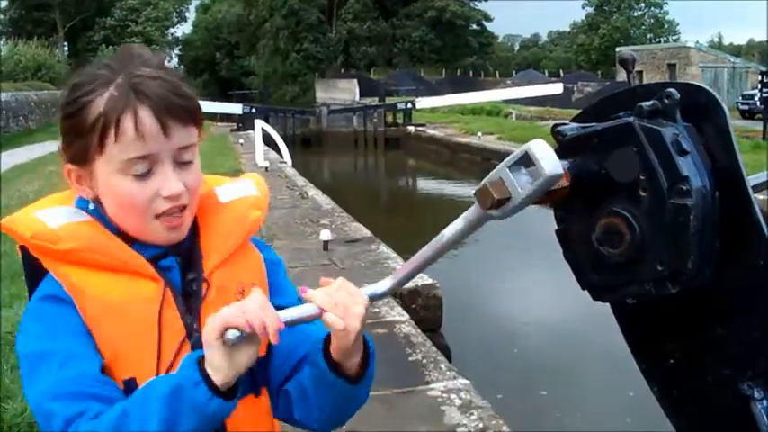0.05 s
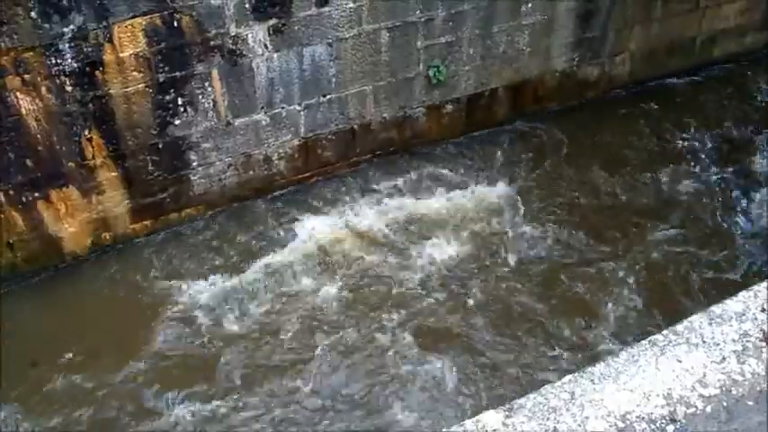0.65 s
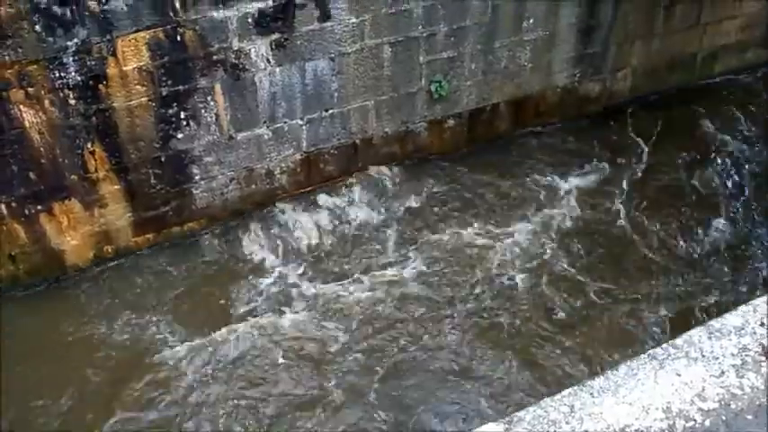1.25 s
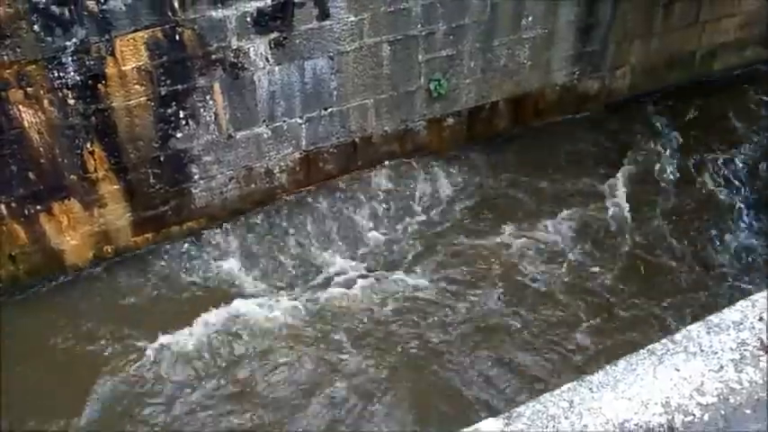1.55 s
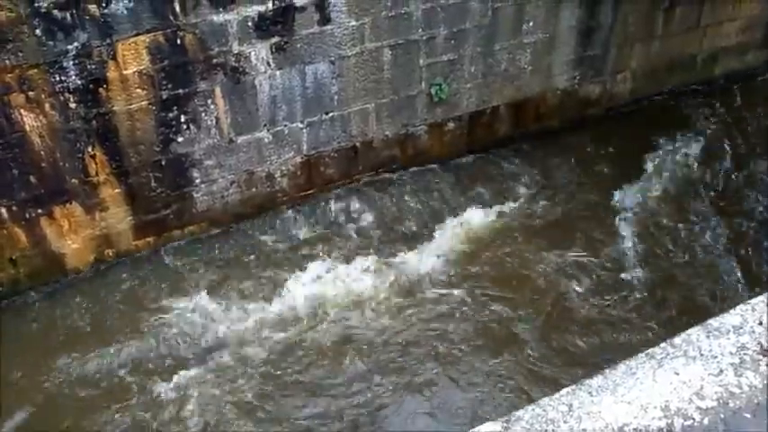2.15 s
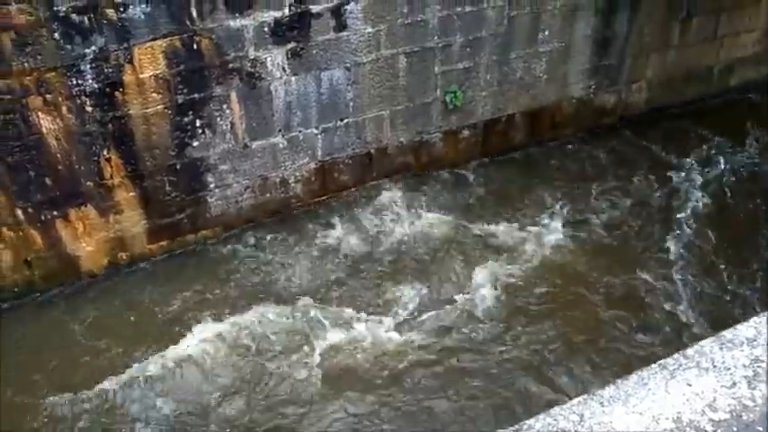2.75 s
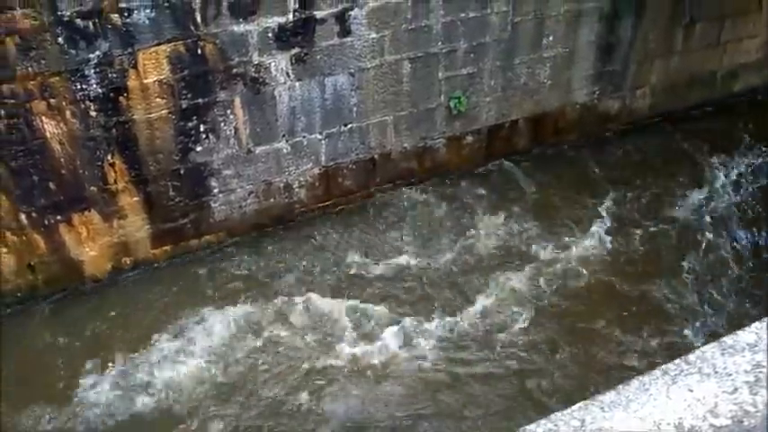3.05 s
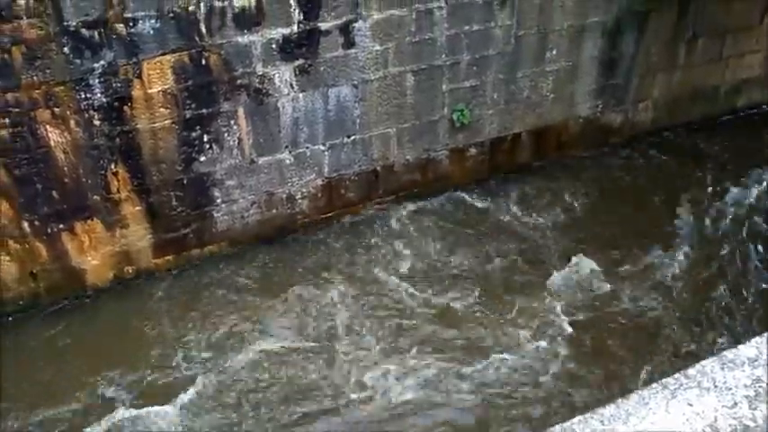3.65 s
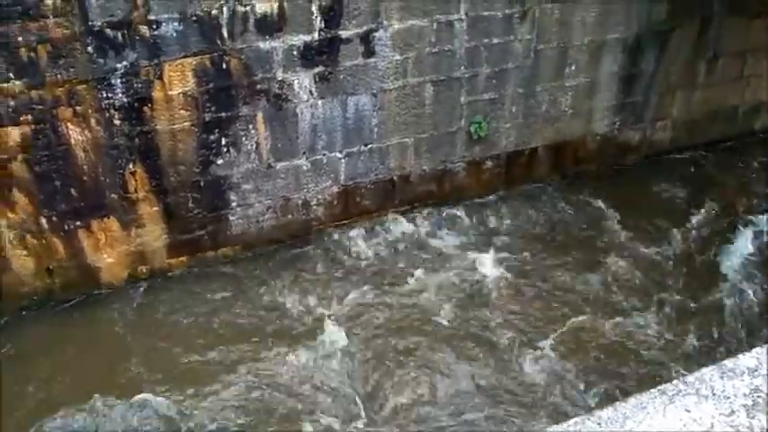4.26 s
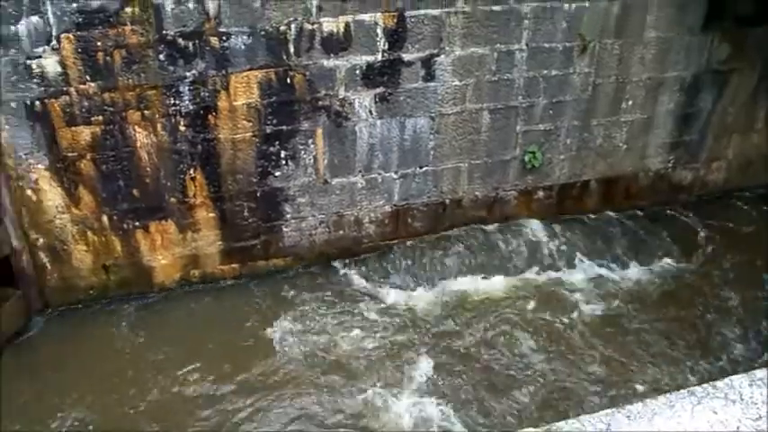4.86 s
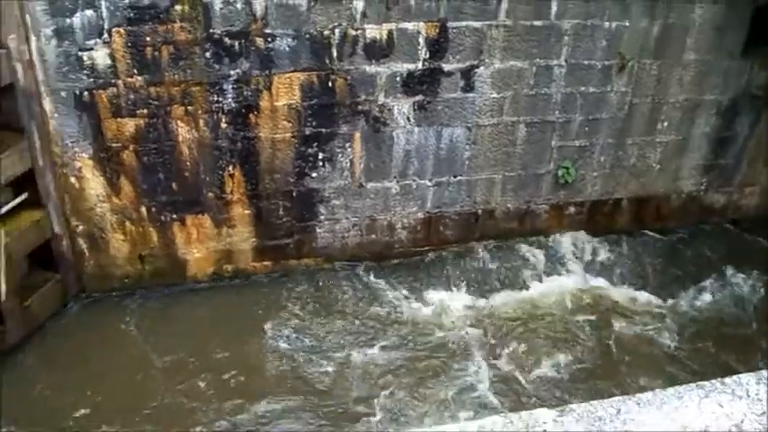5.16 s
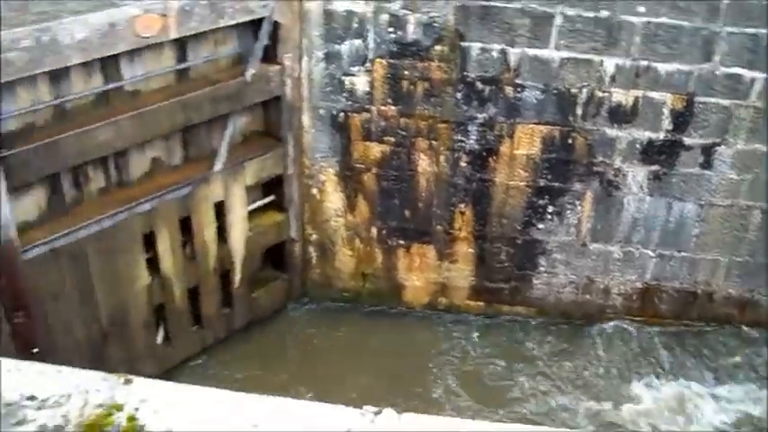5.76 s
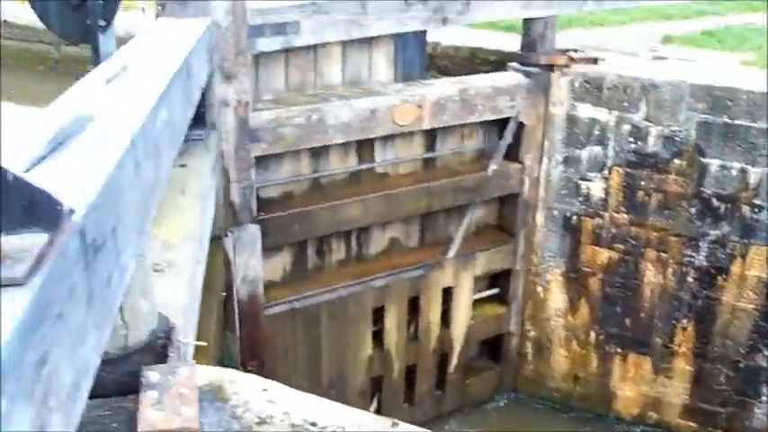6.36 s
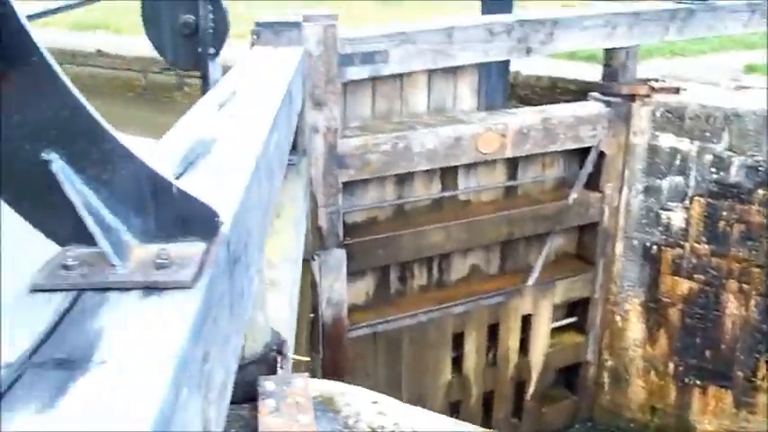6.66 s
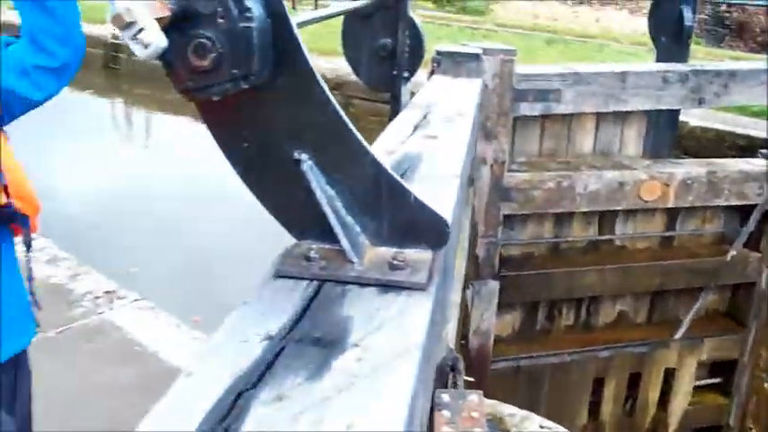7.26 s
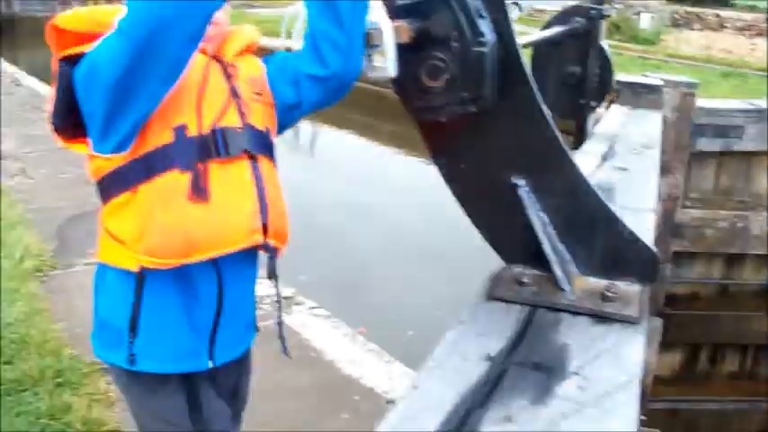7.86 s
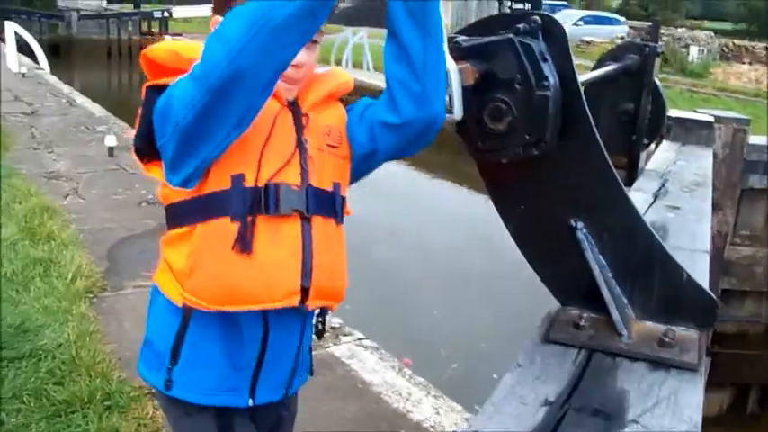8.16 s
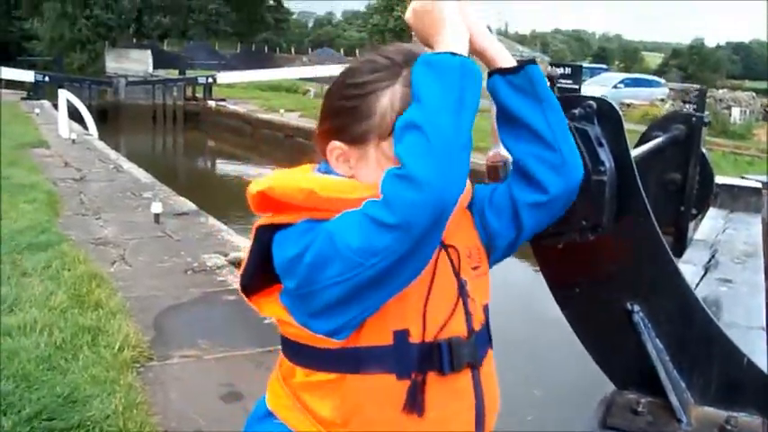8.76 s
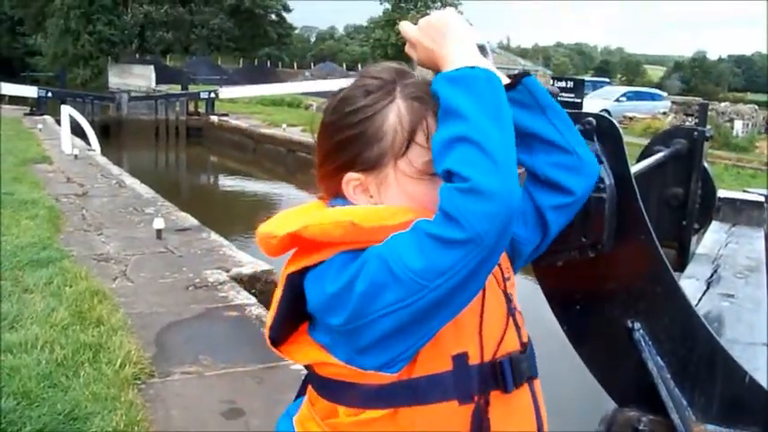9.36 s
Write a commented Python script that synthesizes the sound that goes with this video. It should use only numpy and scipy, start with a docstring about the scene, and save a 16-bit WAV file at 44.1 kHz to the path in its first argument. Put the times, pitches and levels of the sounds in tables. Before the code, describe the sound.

Water rushes steadily into a stone canal lock, churning, bubbling and hissing in surges while wind rumbles and flutters on the microphone. Near the start the sound cuts out briefly and returns with a thump. A low engine-like drone sinks in pitch and climbs back underneath. Iron winding gear clinks twice, a few seconds apart, and the water eases a little as the microphone turns away.

```python
"""Filling a canal lock

Water pours through sluices into a stone lock: countless bubbles ring and merge into churn and spray.
The microphone faces the chamber, then turns away; eddies of wind buffet its ports. A low, engine-like
harmonic drone sags and recovers, and the iron paddle gear, struck twice, rings in its modes.
Early on the sound cuts out for a moment and comes back with a thump."""
import sys
import numpy as np
from scipy import signal
from scipy.fft import rfft, irfft, next_fast_len
from scipy.io import wavfile
from scipy.ndimage import uniform_filter1d, map_coordinates

SR = 44100
rng = np.random.default_rng(int(sys.argv[2]) if len(sys.argv) > 2 else 0)


def dump(signal):
    """Clip the signal to [-1, 1] and save it as 16-bit WAV at the path in sys.argv[1]."""
    limited = np.clip(np.atleast_2d(signal).T, -1, 1)
    pcm = np.round(limited * 32767).astype(np.int16)
    wavfile.write(sys.argv[1], SR, pcm)


N = 423801
TIME = np.arange(N) / SR
SIDES = np.array([[1], [-1]])  # left, right


def from_db(db):
    """Amplitude ratio of a level in decibels."""
    return np.exp(np.asarray(db) * (np.log(10) / 20))


def rms_one(x):
    """Normalisation to unit mean power."""
    return x / np.sqrt(np.mean(x ** 2) + 1e-20)


def in_time(rows):
    """Linear interpolation in time, one curve per column."""
    times, *columns = np.transpose(rows)
    return [np.interp(TIME, times, c) for c in columns]


def at_hz(points, hz):
    """Interpolation of each column on a logarithmic frequency axis."""
    freqs, *columns = np.transpose(points)
    return np.array([np.interp(np.log(hz + 1e-9), np.log(freqs), c) for c in columns])


def butter(x, hz, kind, order=2):
    """Butterworth filter: a maximally flat passband."""
    return signal.sosfilt(signal.butter(order, hz, kind, fs=SR, output="sos"), x)


def colour(x, spectrum):
    """Zero-phase filtering by multiplication in the frequency domain."""
    size = next_fast_len(N)
    gain = from_db(at_hz(spectrum, np.fft.rfftfreq(size, 1 / SR)))
    return irfft(rfft(x, size) * gain, size)[..., :N]


def drift(corner_hz):
    """Slow random fluctuation: low-passed Gaussian noise of unit power."""
    step, settle = 40, 2000
    pole = np.exp(-2 * np.pi * corner_hz * step / SR)
    white = rng.standard_normal(N // step + settle + 2)
    slow = signal.lfilter([1], [1, -2 * pole, pole * pole], white)[settle:]
    return np.interp(np.arange(N) / step, np.arange(len(slow)), rms_one(slow))


def ring(force, hz, t60):
    """Damped oscillator: a unit impulse starts a decaying sine of unit amplitude."""
    r, w = from_db(-60 / (t60 * SR)), 2 * np.pi * hz / SR
    return signal.lfilter([0, np.sin(w)], [1, -2 * r * np.cos(w), r * r], force + 1e-18)


def correlated(mid, side, correlation):
    """Partial coherence: the weighted sum and difference of two independent noises."""
    return np.sqrt(1 + correlation) * mid + np.sqrt(1 - correlation) * side * SIDES


def evened(x):
    """Normalisation by the half-second mean power of the mid signal; fast flicker survives."""
    slow_power = uniform_filter1d((x[0] + x[1]) ** 2 / 4, SR // 2)
    return x / np.sqrt(np.abs(slow_power) + 1e-12)


def drone():
    """Harmonic series of three partials; the overtones swell as they glide through fixed resonances."""
    # glide of the fundamental: (time [s], frequency [Hz])
    glide = [(.62, 102.1), (1.4, 101), (2.0, 93.6), (2.6, 86.3), (3.2, 81.1), (3.8, 77.1), (4.4, 74),
             (4.8, 74.5), (5.2, 68.9), (5.5, 62.2), (5.9, 51.26), (6.35, 41), (6.7, 45.95), (7.2, 60),
             (7.6, 71.2), (8.0, 79.6), (8.6, 82.95), (9.6, 82.5)]
    # strength before resonance and wavering: (time [s], fundamental [dB], overtones [dB])
    effort = [(.45, -46.5, -52), (.62, -50, -36.5), (2.1, -33.5, -34.5), (2.8, -39.5, -40),
              (3.3, -28, -38.5), (3.8, -29.5, -39.5), (4.5, -22.5, -29), (4.9, -22, -39), (5.5, -20, -38),
              (5.9, -28.5, -32.5), (6.25, -39.5, -31.5), (7.3, -34.5, -39), (7.85, -41.5, -32),
              (8.15, -50, -41), (8.9, -44, -43.5), (9.25, -32, -39.5), (9.6, -38, -37.5)]
    # resonance curve: (frequency [Hz], gain [dB])
    resonances = [(80, -13), (102, -1.5), (128, 2), (152, 0), (168, -3), (195, -1), (225, -16), (300, -12)]
    pitch = in_time(glide)[0]
    phase = 2 * np.pi * np.cumsum(pitch * (1 + 0.0076 * drift(8.35))) / SR
    fundamental_db, overtones_db = in_time(effort)
    second_db = overtones_db + at_hz(resonances, 2 * pitch)[0]
    third_db = overtones_db + at_hz(resonances, 3 * pitch)[0] - 9
    out = 0
    for k, db in enumerate([fundamental_db, second_db, third_db], 1):
        waver_db = 1.1 * drift(8) + 1.7 * np.array([drift(20), drift(18)])  # common + per port
        out = out + from_db(db + waver_db) * np.sin(k * phase + SIDES * 0.19)
    return np.sqrt(2) * out * from_db(SIDES * .7)


def wind_strength(breeze_pan_db=3.5):
    """Incoherent addition: gusts add their power to the breeze; the lee port gets less flutter."""
    # wind between gusts: (time [s], rumble [dB], flutter [dB])
    breeze = [(0, -32.5, -41.5), (.7, -33, -35), (2.9, -28.5, -33.5), (3.45, -32, -43), (4.6, -25, -33.5),
              (5.5, -29, -36), (6.15, -40, -44), (6.8, -31.5, -39), (7.7, -34.5, -40.5), (8.6, -35.5, -36),
              (9.6, -41, -48)]
    # Gaussian gusts: (time [s], length [s], flutter [dB], rumble [dB], flutter left over right [dB])
    gusts = [(0.927, 0.056, -20.5, -20.5, 15), (1.03, .06, -22, -26, 12), (1.196, 0.055, -11, -31, 20),
             (1.317, 0.11, -13.5, -31.5, 21), (1.54, 0.1, -17, -28, 18), (2.154, 0.23, -20, -28, 14),
             (2.27, 0.088, -23, -20, -3), (2.78, 0.3, -24.5, -27.5, 9), (2.957, .07, -22, -27, 8.5),
             (3.137, .06, -19, -31, 16), (3.68, 0.12, -20.5, -25, 9), (3.83, .07, -21.5, -20, 12),
             (4.324, 0.14, -18, -24, 14.5), (4.499, 0.072, -27, -28, -3), (5.028, 0.06, -13, -20, 6),
             (5.101, .04, -10.5, -19, -12), (5.3, .14, -17.5, -29, 17.5), (5.52, 0.064, -22, -24, 4),
             (6.33, .08, -30, -40, 3), (6.925, 0.0789, -39, -24, -3), (7.139, .09, -33, -23.5, 10),
             (7.3, 0.084, -39, -28, 4), (7.62, .1, -37, -29, 6), (8.103, 0.12, -33, -36, 0),
             (8.497, .1, -24.5, -26, 13), (8.82, .08, -41, -29, 6)]
    rumble_db, flutter_db = in_time(breeze)
    rumble_power = from_db(rumble_db) ** 2
    flutter_power = from_db(flutter_db + SIDES * breeze_pan_db / 2) ** 2
    for s, length_s, gust_db, low_db, pan_db in gusts:
        span = slice(*np.searchsorted(TIME, [s - 2 * length_s, s + 2 * length_s]))
        bell = np.exp(-(2 * (TIME[span] - s) / length_s) ** 2)
        rumble_power[span] += bell * from_db(low_db) ** 2
        flutter_power[:, span] += bell * from_db(gust_db + np.minimum(SIDES * pan_db, 0)) ** 2
    return np.sqrt(rumble_power), np.sqrt(flutter_power)


def puffs(per_s, spread_db):
    """Poisson process: single eddies slap each port at independent moments."""
    hits = rng.random((2, N)) < per_s / SR
    strength = from_db(spread_db * np.minimum(rng.exponential(1, (2, N)), 3))
    return rms_one(hits * strength)


def wind():
    """Turbulent pressure at the ports: large eddies rumble, small ones flutter and slap."""
    # spectrum of the small eddies: (frequency [Hz], gain [dB])
    spectrum = [(30, -20), (55, 1), (85, -0.5), (130, 0.5), (200, -4), (260, -10.5), (400, -18.5),
                (900, -46.5)]
    rumble_gain, flutter_gain = wind_strength()
    large_eddies = correlated(*rng.standard_normal((2, N)), 0.15)
    rumble = butter(large_eddies, [12, 54], "band") * from_db(drift(10))
    small_eddies = correlated(*rng.standard_normal((2, N)), 0.68) + puffs(per_s=45, spread_db=4.5)
    flutter = butter(colour(small_eddies, spectrum), 14, "high") * from_db(2.2 * drift(20))
    return rumble_gain * rms_one(rumble) + flutter_gain * rms_one(flutter)


def paddle_gear():
    """Modal vibration: iron strikes iron and bounces, each contact ringing the modes over a crack."""
    # blows: (time [s], strength [dB], relative crack [dB], favoured frequency [Hz], far-mode loss [dB])
    clinks = [(2.511, -5.5, -20, 3700, 11), (6.305, -3, -10, 680, 13), (6.311, -10, -7, 3000, 30),
              (6.322, -8, -8, 2450, 30), (6.344, -13, -10, 1700, 30)]
    # modes of the gear: (frequency [Hz], relative level [dB], 60 dB decay time [s])
    modes = [(492, -8, .07), (620, -11, .05), (874, -4, .06), (1394, -14, .05), (2040, -7, .13),
             (2250, -8, .025), (2423, -4, .035), (2542, -8, .035), (2930, -13, .4), (3045, -6, .17),
             (3290, -12, .05), (3560, -9, .07), (4850, -17, .06), (6821, -12.5, .7), (7432, -4, .28)]
    out, age = np.zeros((2, N)), TIME[:SR]
    for s, db, crack_db, favoured_hz, far_db in clinks:
        contact = .015 * rng.standard_normal((2, SR)) * np.exp(-age / .003)
        contact[:, 0] += 1
        noise = correlated(*rng.standard_normal((2, N)), .7)[:, :SR]
        crack = rms_one(butter(noise, [400, 4500], "band", order=1))
        blow = from_db(crack_db) * crack * np.exp(-age / .006)
        for hz, level_db, t60 in modes:
            # the point of contact favours the modes near one frequency
            far = 1 - np.exp(-(np.log2(hz / favoured_hz) / .6) ** 2)
            blow += from_db(level_db - far_db * far) * ring(contact, hz, t60)
        start = round(s * SR)
        out[:, start:start + SR] += from_db(db) * blow
    return out


def gulp(at_s=3.688, centre_hz=590, level_db=-20, width_s=.014):
    """Bubble resonance: a swallowed pocket of air rises in pitch as it nears the surface."""
    age = TIME - at_s
    phase = 2 * np.pi * centre_hz * age * (1 + 2.9 * age)
    return from_db(level_db) * np.exp(-(age / width_s) ** 2) * np.sin(phase)


def foam(turn, slosh, flicker_db):
    """Superposition: countless tiny bubbles merge into noise; each half octave flickers as crests break."""
    # correlation between the ports: (frequency [Hz], facing the water [0-1], turned away [0-1])
    coherence = [(200, 0.6, 1), (550, 1, .89), (820, 0.8, 0.7), (1200, 0.7, 0.9), (2400, 0.3, 0.7),
                 (4000, 0.4, 0.4), (7000, 0, 0.5)]
    out, edges = 0, 140 * 2 ** (np.arange(13) / 2)
    white = rng.standard_normal((2, 2, N))
    for k, (low, high) in enumerate(zip(edges, edges[1:])):
        mid, side = butter(white[k % 2], [low, high], "band")
        facing, away = at_hz(coherence, np.sqrt(low * high))
        gain = slosh * from_db(flicker_db * drift(11))
        out = out + gain * correlated(mid, side, facing + (away - facing) * turn)
    return rms_one(out)


def bubbles(slosh, density, cycles, spread_db, sizes=36):
    """Single bubbles ring as damped oscillators; small ones are commoner, and all cluster with the slosh."""
    out = np.zeros((2, N))
    for hz in np.geomspace(420, 7400, sizes):
        per_s = density / sizes * np.sqrt(hz / 1000) * slosh ** 2
        born = np.flatnonzero(rng.random(N) < per_s / SR)
        strength = from_db(spread_db * np.minimum(rng.exponential(1, len(born)), 4))
        polarity = rng.choice([-1, 1], len(born))
        pan = from_db(SIDES * rng.normal(0, 3.6, len(born)))
        impulses = np.zeros((2, N))
        impulses[:, born] = strength * polarity * pan
        out += np.sqrt(hz) * rms_one(ring(impulses, hz, cycles / hz))
    return rms_one(out)


def surge_levels(release_s=.11):
    """Level envelopes: each crest builds, holds and relaxes exponentially into the steady rush."""
    # rush between surges, each column on its own reference: (time [s], churn [dB], spray [dB])
    flow = [(0, -31, -32), (.45, -33.5, -33.5), (.62, -29.5, -26), (3.0, -31, -25), (5.7, -29.5, -24.5),
            (6.1, -31.5, -27), (6.7, -30.5, -27.5), (7.33, -33, -31), (7.6, -28, -29), (8.3, -30.5, -28.5),
            (9.0, -33, -31.5), (9.6, -37, -35)]
    # breaking crests: (time [s], rise [s], hold [s], churn rise [dB], spray rise [dB])
    surges = [(.6, 0.08, .12, 3, 5.5), (1.294, 0.094, 0.052, 6, 7), (1.453, 0.11, .6, 4, 5),
              (2.335, .13, 0.2, 5.5, 4), (3.035, 0.1, 0.035, 3, 2.5), (3.558, .1, .03, 2.5, 1),
              (3.99, 0.58, 0.34, 5, 5), (5.17, 0.059, 0.02, 5.5, 3), (5.352, 0.076, 0.041, 4, 5),
              (6.398, 0.061, .04, 2.5, 1.5)]
    churn_db, spray_db = in_time(flow)
    for s, rise_s, hold_s, churn_rise_db, spray_rise_db in surges:
        age = TIME - s
        attack = np.clip(age / rise_s, 0, 1)
        release = np.exp(-np.clip(age - rise_s - hold_s, 0, 2) / release_s)
        churn_db += churn_rise_db * attack * release
        spray_db += spray_rise_db * attack * release
    return churn_db + 2, spray_db - 0.5


def water():
    """Directional pickup of bubble noise: the heading sets its spectrum and the delay between the ports."""
    # heading of the microphone: (time [s], turn [0 facing the water, 1 turned away])
    heading = [(0, 1), (.45, 0.97), (.62, 0.053), (3.0, 0.038), (5.0, 0.16), (5.7, 0.46), (6.2, 0.53),
               (7.2, 0.88), (8.2, 0.92), (9.6, 0.97)]
    # spectrum facing the water: (frequency [Hz], left gain [dB], right gain [dB])
    facing = [(120, -5.5, -2.5), (220, -1, -4), (390, -3.5, -5.5), (500, 0.5, -0.5), (740, -2, -3.5),
              (1200, -2.5, -4.5), (2020, -3, -4.5), (2600, 0.5, -5.5), (3370, 0, -1), (4100, -5.5, -3.5),
              (4800, -11, -4), (5500, -10, -2), (6810, -6.5, -1), (8200, -24.5, -21)]
    # spectrum turned away: (frequency [Hz], left gain [dB], right gain [dB])
    away = [(120, -2, -0.5), (215, 1.5, 1.5), (420, 1, -0.5), (520, 2, 1), (845, 0.5, -1.5), (1220, -1, -5),
            (2000, 0, -5.5), (2550, 1.5, -7), (3180, 4.5, -4), (4100, 0.5, -6), (4800, -1, -11),
            (5600, -7.5, -3.5), (6680, -4, -3.5), (8100, -24.5, -22)]
    turn = in_time(heading)[0]
    slosh = from_db(.5 * drift(9))
    rush = foam(turn, slosh, flicker_db=1.05)
    rush += from_db(-9.5) * bubbles(slosh, density=1100, cycles=16, spread_db=4)
    coloured = (1 - turn) * colour(rush, facing) + turn * colour(rush, away)
    left, right = butter(coloured, 110, "high")
    lag_s = .00001 + .00018 * turn
    late_right = map_coordinates(right, [(TIME - lag_s) * SR], order=3, mode="nearest")
    ports = np.array([left, late_right])
    # the roar of deep churning and the hiss of spray swell separately
    churn = signal.sosfiltfilt(signal.butter(3, 1500, fs=SR, output="sos"), ports)
    spray = ports - churn
    churn_db, spray_db = surge_levels()
    return from_db(churn_db) * evened(churn) + from_db(spray_db) * evened(spray)


def scene():
    """Linear superposition of all sources at the two ports."""
    return water() + gulp() + wind() + drone() + paddle_gear()


def record(dry):
    """Transfer to the output: notches, brief dips, a gap ending in a thump, soft saturation, low-pass."""
    # hollows in the microphone's response: (frequency [Hz], width [Hz])
    notches = [(305, 190), (965, 35)]
    # brief dips in level: (time [s], depth [dB], recovery time constant [s])
    dips = [(5.045, 5, 0.031), (5.105, 10.5, 0.035)]
    gap_start_s, gap_end_s, cutoff_hz = .453, .624, 7750
    thump_s, thump_rise_s = .6153, .0011
    x = dry
    for hz, width_hz in notches:
        notched = signal.lfilter(*signal.iirnotch(hz, hz / width_hz, fs=SR), x)
        x = x + 0.86 * (notched - x)
    for s, depth_db, recovery_s in dips:
        x = x * from_db(-depth_db * (TIME > s) * np.exp(-np.abs(TIME - s) / recovery_s))
    x = x * ((TIME < gap_start_s) | (TIME > gap_end_s))
    thump_age = np.clip((TIME - thump_s) / thump_rise_s, 0, 20)
    x = x + from_db(-10) * thump_age * np.exp(1 - thump_age)
    x[:, round(gap_end_s * SR)] += from_db(1)  # a click as the sound returns
    x = 1.66 * np.tanh(x / 1.597)
    return signal.sosfilt(signal.ellip(10, .3, 80, cutoff_hz, fs=SR, output="sos"), x)


dry = scene()
out = record(dry)
dump(out)
```